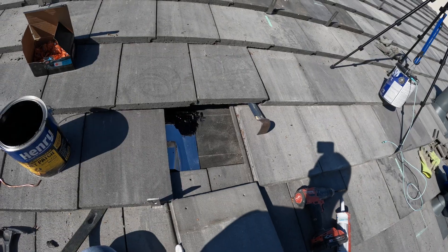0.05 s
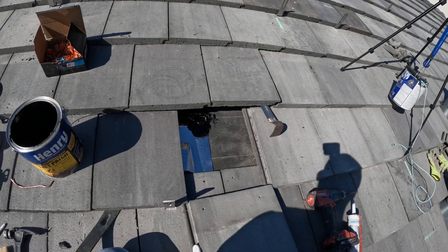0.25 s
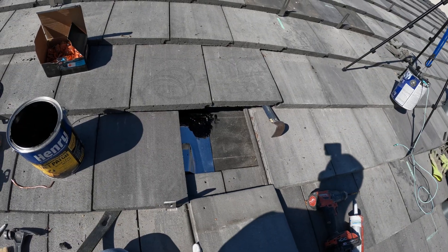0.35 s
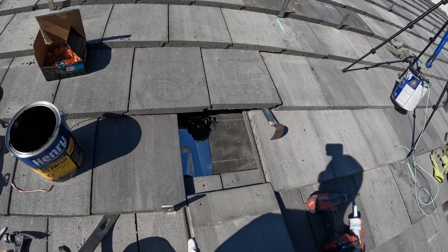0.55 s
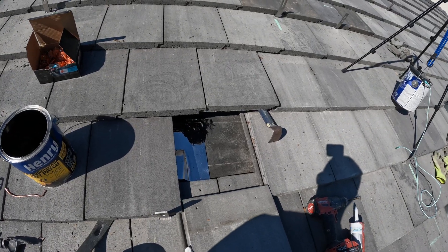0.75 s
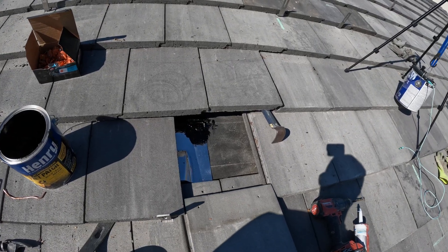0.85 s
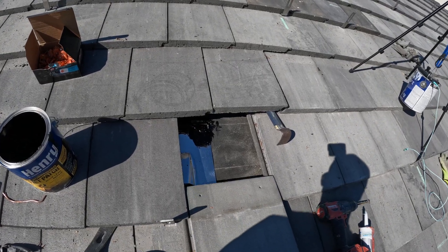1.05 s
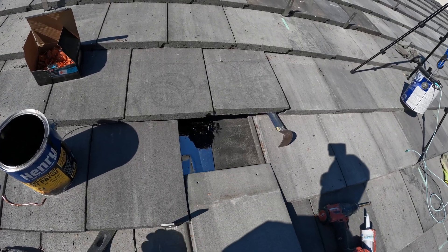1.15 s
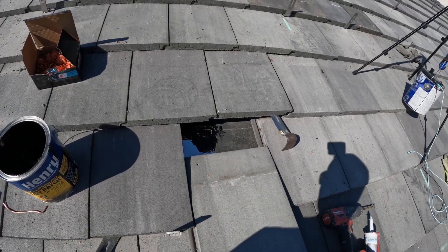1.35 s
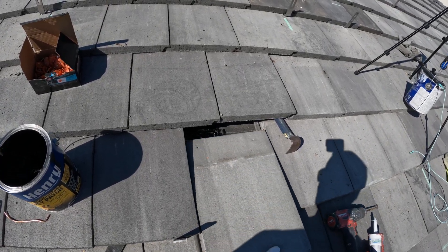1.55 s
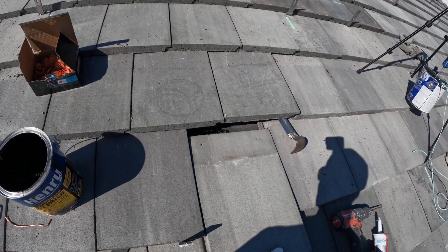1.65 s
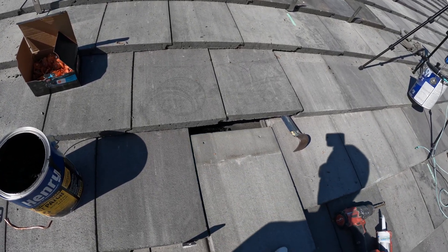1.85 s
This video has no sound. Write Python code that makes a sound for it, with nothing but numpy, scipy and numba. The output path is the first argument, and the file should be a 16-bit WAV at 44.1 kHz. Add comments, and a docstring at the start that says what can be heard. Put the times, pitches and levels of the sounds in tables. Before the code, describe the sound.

A concrete roof tile scuffs and knocks lightly a few times, then grinds over its neighbours in one long gritty shove, ending with small ticks. It is close by, outdoors, with light wind on the microphone.

```python
"""Pushing a concrete roof tile into place

Outdoors, an arm's length away, a tile scuffs a few times, then grinds over its neighbours in one
long shove. Sand grains catch and break between the faces and set the tiles ringing. The tile catches
on high spots, and its edges knock and tick on the others until it settles. The roof deck thumps
below, and a light wind brushes the microphone."""
import sys
import numpy as np
from scipy import signal
from scipy.fft import rfft, irfft, next_fast_len
from scipy.io import wavfile
from scipy.ndimage import map_coordinates
from numba import njit

SR = 44100
rng = np.random.default_rng(int(sys.argv[2]) if len(sys.argv) > 2 else 0)


def master_out(mix):
    """Clip the mix to full scale and print it as 16-bit PCM to the path in sys.argv[1]."""
    frames = np.transpose(np.atleast_2d(mix))
    ceiling = np.clip(frames, -1, 1)
    pcm = np.round(ceiling * 32767).astype(np.int16)
    wavfile.write(sys.argv[1], SR, pcm)


N = 83790
TIME = np.arange(N) / SR

# Strokes of the tile: short scuffs (one list each), a short push and the long shove.
# Columns: time_s, bass_db, middle_db, treble_db
SCUFFS = [
    [(0.142, -45, -48.5, -43.5), (0.188, -49.5, -47, -61), (0.218, -31.5, -37, -46), (0.252, -34, -41, -50)],
    [(0.268, -21, -25, -45), (0.294, -34.5, -29.5, -42.5), (0.31, -33, -45, -61)],
    [(0.352, -29, -47, -60), (0.368, -37, -38, -46), (0.412, -30, -31, -44), (0.462, -24.5, -36.5, -50)],
    [(0.735, -43, -40, -49), (0.751, -24, -35.5, -41), (0.763, -30.5, -31, -50), (0.777, -27, -35.5, -47),
     (0.803, -45, -42, -56), (0.825, -38, -38, -59)],
]
PUSH = [(0.475, -23, -22, -35), (0.569, -27, -26, -38), (0.659, -30, -34.5, -41.5), (0.683, -44, -42, -55),
        (0.705, -43, -33.5, -48), (0.725, -42, -44, -52)]
SHOVE = [(0.839, -22.5, -30.5, -36.5), (0.901, -18.5, -24, -33), (1.147, -20, -21.5, -33.5),
         (1.313, -22, -22.5, -32.5), (1.349, -23, -20, -33), (1.39, -20.5, -21.5, -35),
         (1.5, -22, -21, -35), (1.56, -25.5, -21, -36.5), (1.619, -25.5, -25, -38.5),
         (1.675, -35, -33.5, -49.5), (1.7, -49, -51, -63)]
# Modes (pitches a thing rings at) of the sliding tile and those below: pitch_hz, width_hz, gain_db
TILE_MODES = [(211, 113, -1.5), (459, 20, 4), (816, 41, -6), (980, 48, -4), (1237, 56, 7.5), (1916, 38, 3),
              (2600, 51, -6), (3106, 20, 3), (5088, 40.4, 10.5), (6640, 30, 8.5)]
LOWER_TILE_MODES = [(1634, 22, 3), (2367, 74, -1.5), (2930, 30, 4.5), (3680, 24, 3.5), (5780, 40, -0.5),
                    (11030, 84, -1.5)]
# Rings that glide as the tile slides, one list each: time_s, pitch_hz, gain_db
GLIDES = [
    [(0.42, 364, 16.5), (0.88, 342, 9.5), (1.02, 370, 11), (1.12, 416, 10.5), (1.24, 450, 5.5),
     (1.36, 508, 7.5), (1.6, 476, 0)],
    [(0.5, 1330, -3), (1.0, 1414, -3), (1.22, 1500, 4), (1.5, 1530, 9), (1.62, 1690, 3)],
    [(0.85, 2310, -9), (1.15, 2490, 3), (1.27, 2440, 2), (1.45, 2120, -5)],
    [(1.0, 2620, -8), (1.2, 2640, 6), (1.38, 2700, -5), (1.48, 2716, 12.5), (1.64, 2750, 3.5)],
]
# High spots that catch the shove: start_s, peak_db, pitch_hz
CATCHES = [(0.883, -15, 414), (0.945, -13.5, 370), (0.96, -19, 545), (1.06, -8.5, 320), (1.08, -15, 584),
           (1.121, -10.5, 563), (1.244, -9.5, 440), (1.323, -12, 497), (1.37, -11, 522),
           (1.394, -11.5, 538)]
# Dull knocks of tile on tile: start_s, force_db, cutoff_hz
KNOCKS = [(0.139, -26.5, 392), (0.3209, -20, 1500), (0.3244, -14, 800), (0.337, -19, 790),
          (0.3422, -18, 900), (0.472, -17.5, 1800), (0.7492, -21.5, 534), (0.7583, -23, 746),
          (1.666, -25.5, 2000)]
# Sharp ticks of edges and breaking grit: start_s, force_db, decay_s
TICKS = [(0.03, -47.5, 0.023), (0.058, -39, 0.013), (0.137, -35.5, 0.01), (0.237, -25.5, 0.0071),
         (0.258, -17.5, 0.007), (0.34, -24.5, 0.0079), (0.474, -18, 0.0055), (0.513, -23.5, 0.024),
         (0.81, -29.5, 0.029), (0.837, -22, 0.0044), (1.709, -35.5, 0.064), (1.7217, -19, 0.0038),
         (1.734, -28.5, 0.012), (1.791, -39, 0.024), (1.825, -32.5, 0.018), (1.8489, -32, 0.012),
         (1.869, -30, 0.029)]
# Single sand grains bursting: start_s, strength_db
GRAIN_BURSTS = [(0.2353, -22), (0.261, -22.5), (0.34, -29.5), (0.4724, -20.5), (0.513, -27), (0.5724, -23),
                (0.6098, -21), (0.7605, -20.5), (1.7223, -22)]
# The roof deck taking the weight: start_s, level_db, pitch_hz, rise_s
THUMPS = [(0.324, -13, 131, 0.0061), (0.344, -19.5, 93, 0.01), (0.551, -15.5, 312, 0.005),
          (0.752, -19.5, 47.3, 0.01), (1.113, -14.5, 148, 0.0074), (1.2284, -6.5, 115, 0.0043),
          (1.826, -28, 235, 0.0074)]
# How late the bounce off the roof arrives: time_s, delay_s
BOUNCE_DELAY = [(0.85, .0034), (1.65, 0.00283)]
# How far the microphone's left opening leads its right: frequency_hz, lead_radians
LEFT_LEAD = [(0, 0.13), (2330, -1.07), (3190, -0.72), (4650, -0.3), (6800, 0.14), (7670, -0.9),
             (8610, 0.32), (14200, 0.05)]
# The wind rising and falling: time_s, level_db
WIND_LEVELS = [(0.0, -42.5), (0.93, -27), (1.15, -30), (1.6, -40), (1.69, -37.5), (1.9, -33)]
# Tone curves, which turn each sound's lows and highs up or down: frequency_hz, gain_db
LIGHT_RUB_TONE = [(40, 2), (90, 2), (170, 8.5), (240, -4), (340, -7), (500, 1), (660, 1.5), (760, -7.5),
                  (1100, -11), (1400, -9), (2200, -16), (3000, -14), (4500, -12.5), (6500, -12.5),
                  (8800, -18.5), (11500, -19), (14000, -33)]
HEAVY_RUB_TONE = [(40, -9), (70, -3.5), (120, 2.5), (200, 0), (290, -4), (400, -4), (600, 1.5), (730, -0.5),
                  (1080, -8), (1400, -3), (1800, -10.5), (2600, -13), (3400, -16.5), (4600, -17),
                  (7000, -21), (8800, -29.5), (11500, -30), (14000, -44)]
KNOCK_TONE = [(40, -22), (110, 2), (210, 1), (300, 5), (450, 8), (680, -3.5), (950, 5.5), (1130, -1.5),
              (1300, 1.5), (4000, -1.5), (14000, 11)]
TICK_TONE = [(100, -44), (500, 10.5), (1300, 8), (2600, 11), (4200, 6), (6500, 5), (8800, -1.5),
             (11500, -7), (14000, -22)]
GRAIN_BURST_TONE = [(1500, -36), (4000, -7), (6500, 7.5), (9000, -5), (11500, 2.5), (14000, -15)]
SCATTER_TONE = [(100, -14.5), (500, -12.5), (1200, -1.5), (2400, 2.5), (5000, -3), (8000, 0.5),
                (14000, -27)]
WIND_TONE = [(12, 13), (30, -4.5), (70, -8.5), (120, -13.5), (250, -20.5), (1000, -49)]
HISS_TONE = [(100, -3.5), (400, -4), (800, -15), (1600, -17), (6000, -27.5), (14000, -46)]

BASS_TOP_HZ, TREBLE_FROM_HZ, STROKE_FADE_S = 907, 3340, 0.012
JUDDER_HZ, CRACKLE_HZ, WANDER_HZ = 71, 110, 2.8  # how fast the random changes are
KNOCK_DECAY_S, KNOCK_SNAP_DB = 0.0041, 11.5


def rubbing(strokes, tone, grains_per_s, judder_db, crackle_db):
    """Sand sticks and slips under the tile; bass, middle and treble swell with each stroke."""
    force = sand_grains(grains_per_s) * from_db(judder_db * drift(JUDDER_HZ))
    sound = shape_tone(sliding_tile(force), tone)
    bass, upper = split_at(sound, BASS_TOP_HZ)
    middle, treble = split_at(upper, TREBLE_FROM_HZ)
    treble = treble * from_db(crackle_db * drift(CRACKLE_HZ))  # fine grit breaks in spurts
    out = 0
    for stroke in strokes:
        times, *levels = np.transpose(stroke)
        inside_s = np.minimum(TIME - times[0], times[-1] - TIME)  # negative outside the stroke
        fade = np.clip(1 + inside_s / STROKE_FADE_S, 0, 1)
        for level_db, band in zip(levels, (bass, middle, treble)):
            out = out + fade * from_db(np.interp(TIME, times, level_db)) * unit_power(band)
    return out


def sand_grains(per_s, spread_db=2):
    """Grains catch and break as random clicks, a few larger than the rest."""
    sizes = from_db(spread_db * np.minimum(rng.exponential(1, N), 4))
    signs = rng.choice([-1, 1], N)
    breaks = rng.random(N) < per_s / SR
    return unit_power(sizes * signs * breaks)


def sliding_tile(force):
    """The tiles ring, and some of the rings glide in pitch as the overlap changes."""
    out = tile_body(force, lower_tiles_db=1, wander_db=4.5)
    for path in GLIDES:
        times, pitch_hz, gain_db = np.transpose(path)
        ring = moving_ring(force, np.interp(TIME, times, pitch_hz), width_hz=65)
        out = out + from_db(np.interp(TIME, times, gain_db)) * ring
    return add_roof_bounce(out)


def tile_body(force, lower_tiles_db, wander_db=0):
    """A force makes a dead sound of its own and rings both this tile and those below."""
    top = ringing(force, TILE_MODES, wander_db)
    below = ringing(force, LOWER_TILE_MODES, wander_db)
    return force + top + from_db(lower_tiles_db) * below


def ringing(force, modes, wander_db):
    """Each mode swells, fades and bends a little in pitch as the point of contact moves."""
    out = 0
    for pitch_hz, width_hz, gain_db in modes:
        gain = from_db(gain_db + wander_db * drift(WANDER_HZ))
        bent_hz = pitch_hz * (1 + 0.0085 * drift(WANDER_HZ))
        out = out + gain * moving_ring(force, bent_hz, width_hz)
    return out


def catches():
    """Each high spot clacks on the tile and rings the hollow beneath it."""
    out = 0
    for start_s, peak_db, pitch_hz in CATCHES:
        contact = crumble(start_s, KNOCK_DECAY_S, snap=from_db(KNOCK_SNAP_DB))
        force = filtered(contact, 1500, "low")
        hollow = steady_ring(force, pitch_hz, width_hz=47)
        clack = from_db(-24) * force
        out = out + at_peak(hollow + clack, peak_db)
    return out


def knocks():
    """Heavy, soft hits of tile on tile ring the low modes."""
    force = 0
    for start_s, force_db, cutoff_hz in KNOCKS:
        contact = crumble(start_s, KNOCK_DECAY_S, snap=from_db(KNOCK_SNAP_DB))
        force = force + at_peak(filtered(contact, cutoff_hz, "low"), force_db)
    return shape_tone(tile_body(force, lower_tiles_db=3), KNOCK_TONE)


def ticks():
    """Light, hard hits ring the high modes, each edge striking a different mix."""
    force = sum(at_peak(crumble(start_s, decay_s, snap=from_db(9.5)), force_db)
                for start_s, force_db, decay_s in TICKS)
    rings = ringing(force, [*TILE_MODES, *LOWER_TILE_MODES], wander_db=5.5)
    return shape_tone(force + from_db(-0.5) * rings, TICK_TONE)


def grain_bursts():
    """Single bursting grains are too small to ring the tile, so they sound short and crisp."""
    bursts = sum(at_peak(crumble(start_s, decay_s=0.0039), db) for start_s, db in GRAIN_BURSTS)
    return shape_tone(bursts, GRAIN_BURST_TONE)


def crumble(start_s, decay_s, snap=0):
    """One contact: an optional first snap, then a burst of tiny breaks that dies away."""
    fade = (TIME >= start_s) * np.exp(-np.abs(TIME - start_s) / decay_s)
    click = np.arange(N) == int(start_s * SR)
    return rng.standard_normal(N) * fade + snap * click


def deck_thumps():
    """The roof deck swings under the weight and comes to rest within a few swings."""
    out = 0
    for start_s, level_db, pitch_hz, rise_s in THUMPS:
        age_s = np.maximum(TIME - start_s, 0)
        swell = (age_s / rise_s * np.exp(1 - age_s / rise_s)) ** 2
        out = out + from_db(level_db) * swell * np.sin(2 * np.pi * pitch_hz * age_s)
    return out


def add_roof_bounce(sound):
    """One faint echo off the roof, whose path shortens as the tile slides, sweeps the tone upward."""
    delay_s = np.interp(TIME, *np.transpose(BOUNCE_DELAY))
    echo = map_coordinates(sound, [(TIME - delay_s) * SR], order=3)
    return sound + from_db(-22) * echo


def roof_scatter(sound, fade_s=0.085):
    """Nearby tiles return a spray of echoes, different on each side, that falls 60 dB in fade_s."""
    tail = rng.standard_normal((2, N)) * np.exp(-np.log(1000) * TIME / fade_s)
    tail = tail / np.sqrt(np.sum(tail ** 2, axis=1, keepdims=True))
    echoes = signal.fftconvolve(sound[None], tail, axes=1)[:, :N]
    return from_db(-11) * shape_tone(echoes, SCATTER_TONE)


def microphone_openings(sound):
    """The direct sound reaches the microphone's two openings slightly out of step."""
    size = 2 * next_fast_len(N)
    lead = np.interp(np.arange(size // 2 + 1) * SR / size, *np.transpose(LEFT_LEAD))
    phase_shift = np.exp(1j * lead * np.array([[0.5], [-0.5]]))
    return irfft(rfft(sound, size) * phase_shift)[:, :N]


def wind_and_hiss():
    """Wind rumbles on the microphone over the faint hiss of the surroundings."""
    rumble = filtered(shape_tone(stereo_noise(), WIND_TONE), 17, "high")
    gusts = from_db(np.interp(TIME, *np.transpose(WIND_LEVELS)))
    hiss = shape_tone(stereo_noise(), HISS_TONE)
    return gusts * unit_power(rumble) + from_db(-56.5) * unit_power(hiss)


def stereo_noise():
    """Noise that is nearly the same on the left and right."""
    centre, side = rng.standard_normal((2, N))
    return centre + from_db(-15.5) * side * np.array([[1], [-1]])


def steady_ring(force, pitch_hz, width_hz):
    """Ring at one pitch; a smaller width rings for longer."""
    decay = np.exp(-np.pi * width_hz / SR)
    feed = np.array([1, 0, -1]) * (1 - decay ** 2) / 2
    feedback = [1, -2 * decay * np.cos(2 * np.pi * pitch_hz / SR), decay ** 2]
    return signal.lfilter(feed, feedback, force + 1e-18)


@njit
def moving_ring(force, pitch_hz, width_hz):
    """Ring at a pitch that can change from sample to sample."""
    decay = np.exp(-np.pi * width_hz / SR)
    angle = 2 * np.pi * pitch_hz / SR
    out, swing = np.zeros(len(force)), 0j
    for i in range(len(force)):
        swing = swing * decay * complex(np.cos(angle[i]), np.sin(angle[i])) + force[i]
        out[i] = 2 * (1 - decay) * swing.real
    return out


def drift(rate_hz):
    """A smooth random wander, about 1 in size."""
    step, warm_up = 20, 2000
    decay = np.exp(-2 * np.pi * rate_hz * step / SR)
    noise = rng.standard_normal(N // step + warm_up + 2)
    slow = signal.lfilter([1], [1, -2 * decay, decay ** 2], noise)[warm_up:]
    return np.interp(np.arange(N) / step, np.arange(len(slow)), unit_power(slow))


def shape_tone(sound, tone):
    """Apply a tone curve so that nothing rings before its cause (a minimum-phase filter)."""
    size = 2 * next_fast_len(N)
    hz, db = np.transpose(tone)
    curve_db = np.interp(np.log(np.arange(size // 2 + 1) * SR / size + 1), np.log(hz), db)
    cepstrum = irfft(np.log(from_db(curve_db)))
    cepstrum[1:size // 2] *= 2  # fold the late half of the cepstrum onto the early half
    cepstrum[size // 2 + 1:] = 0
    return irfft(rfft(sound, size) * np.exp(rfft(cepstrum)))[..., :N]


def filtered(sound, cutoff_hz, keep):
    """Keep the "low" or the "high" side of a cutoff."""
    return signal.sosfilt(signal.butter(2, cutoff_hz, keep, fs=SR, output="sos"), sound + 1e-18)


def split_at(sound, hz):
    """Return the lows and the highs, each filtered twice for a cleaner split."""
    return [filtered(filtered(sound, hz, keep), hz, keep) for keep in ("low", "high")]


def from_db(db):
    """Turn decibels into a multiplier."""
    return 10 ** (np.asarray(db) / 20)


def unit_power(sound):
    """Scale to an average power of 1."""
    return sound / np.sqrt(np.mean(sound ** 2) + 1e-20)


def at_peak(sound, db):
    """Scale so the highest peak is at this level."""
    return from_db(db) * sound / np.abs(sound).max()


def scene():
    """Scuffs, shove and hits on the open roof, slightly to the right."""
    light = rubbing([*SCUFFS, PUSH], LIGHT_RUB_TONE, grains_per_s=3500, judder_db=2, crackle_db=1.5)
    heavy = rubbing([SHOVE], HEAVY_RUB_TONE, grains_per_s=6000, judder_db=0.9, crackle_db=2)
    direct = light + heavy + catches() + knocks() + ticks() + grain_bursts() + deck_thumps()
    roof = microphone_openings(direct) + roof_scatter(direct)
    return roof * from_db([[-0.25], [0.25]]) + wind_and_hiss() * from_db([[-1.3], [1.3]])


def record(dry):
    """Cut the highest treble steeply, by at least 70 dB from 14800 Hz up."""
    return signal.sosfilt(signal.cheby2(16, 70, 14800, fs=SR, output="sos"), dry)


dry = scene()
out = record(dry)
master_out(out)
```